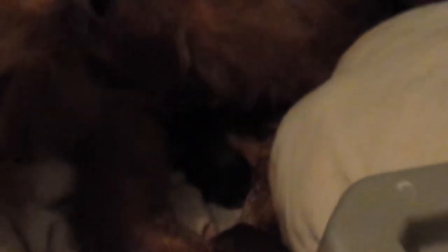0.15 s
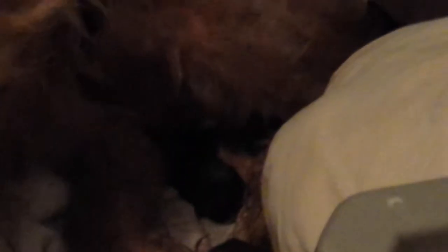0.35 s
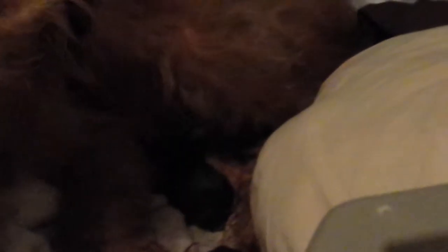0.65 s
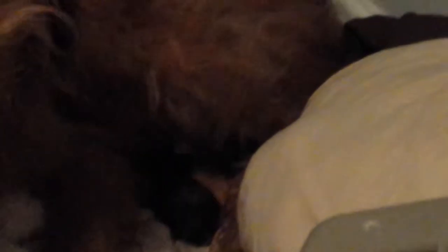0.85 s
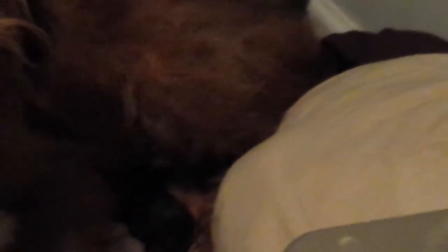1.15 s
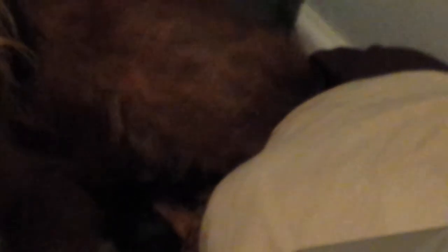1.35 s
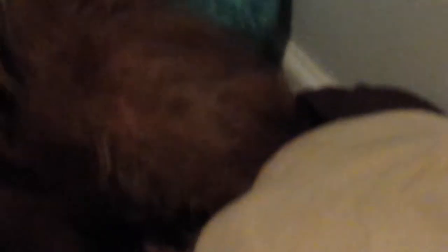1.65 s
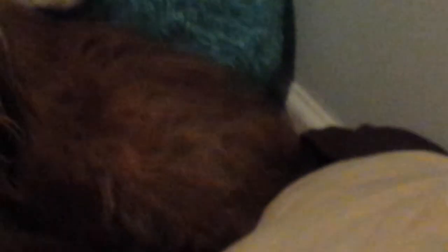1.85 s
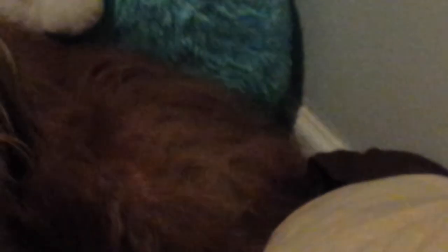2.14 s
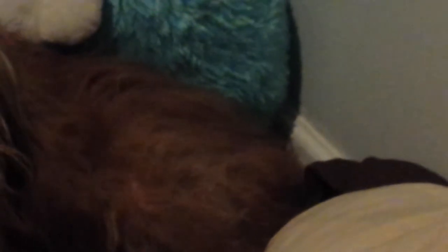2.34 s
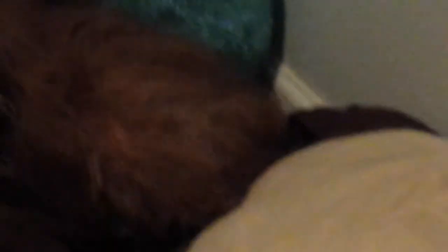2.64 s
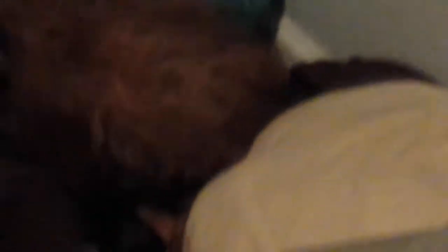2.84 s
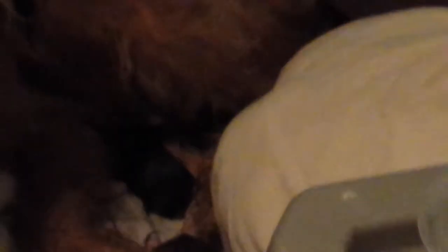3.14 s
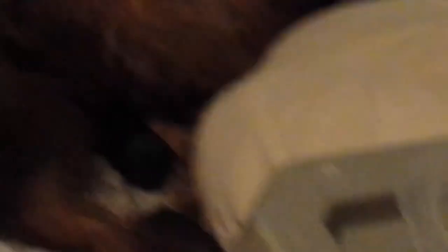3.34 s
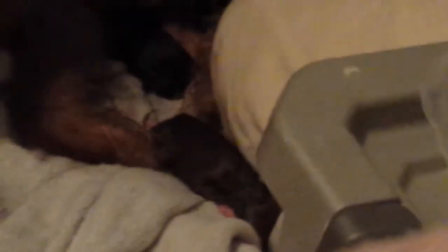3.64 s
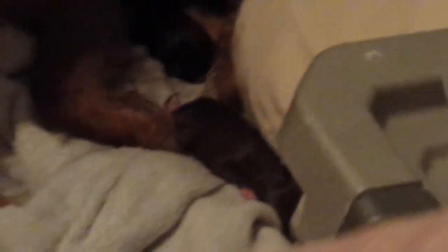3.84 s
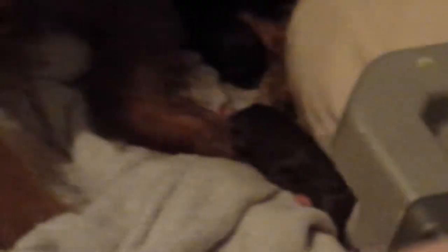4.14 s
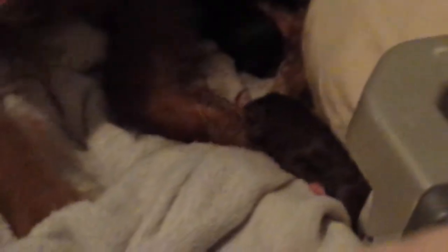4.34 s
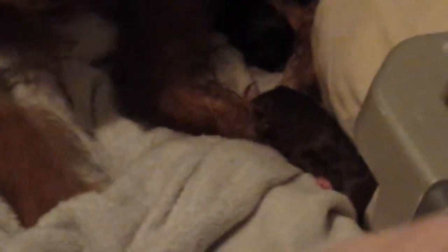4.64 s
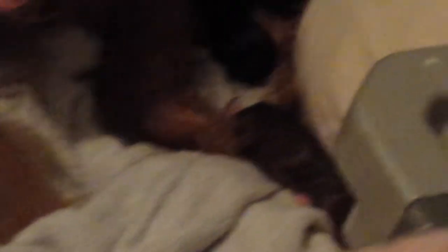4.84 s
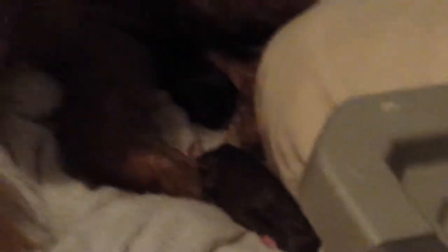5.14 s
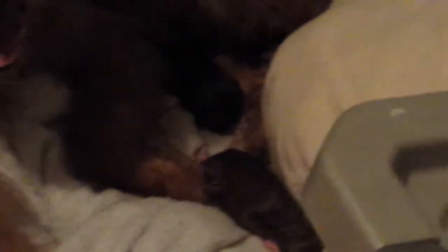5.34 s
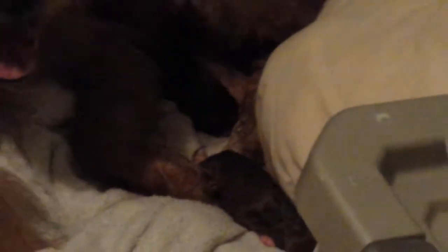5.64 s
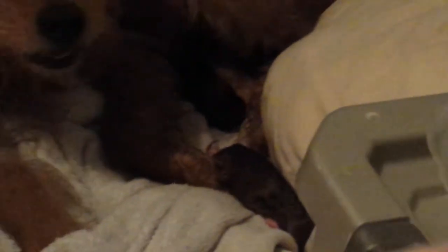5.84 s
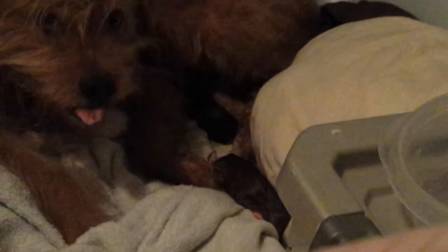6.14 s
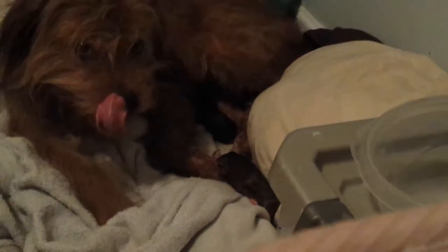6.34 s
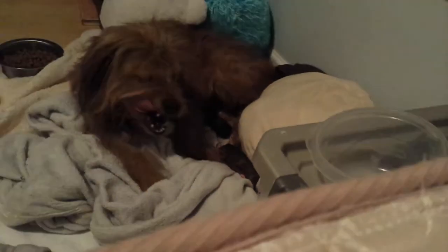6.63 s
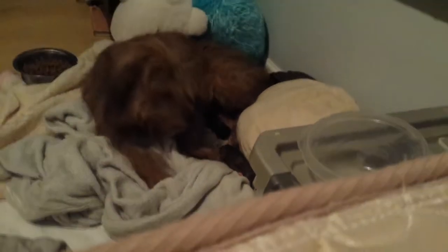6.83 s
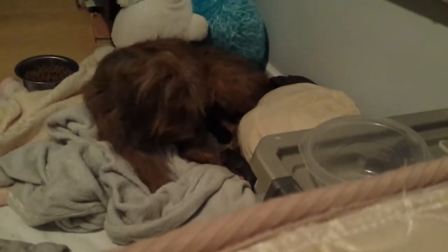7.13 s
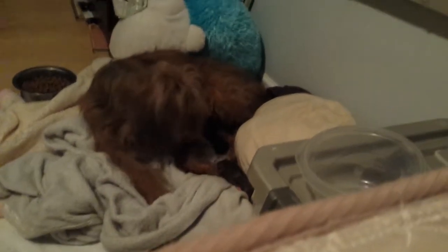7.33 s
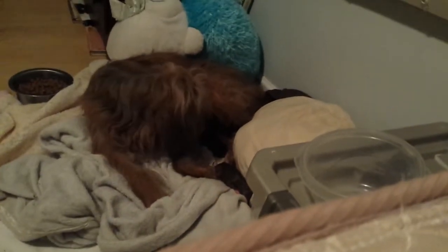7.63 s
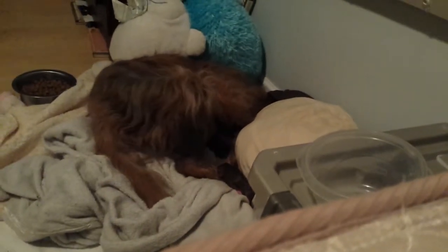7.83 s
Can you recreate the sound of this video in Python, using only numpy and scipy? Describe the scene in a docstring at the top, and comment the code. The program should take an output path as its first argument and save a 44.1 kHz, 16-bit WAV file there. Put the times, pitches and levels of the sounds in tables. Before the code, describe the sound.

Short, thin squeaks come from nursing newborn puppies, about one a second, mixed with little wet mouth clicks. Past the middle, a hoarse whine and then a longer, quavering one rise nearby, mostly on the left. Faint rustling follows as the mother noses through the blankets. The hand-held microphone picks up dull bumps, a few sharp taps and a pop, over the low hum and hiss of a quiet small room.

```python
"""A newborn puppy squeaks and grunts close by in a small room; more squeaks and two long whines follow,
made by tiny vocal folds sounding through a moving mouth. The litter suckles and smacks, and the mother
licks and nuzzles through fur and bedding. The microphone is a hand-held camera's, left port facing the
puppies; fingers bump, creak and tap right on its case and once pop that port. Behind it all an
appliance hums and the microphone hisses."""
import sys
import numpy as np
from scipy import signal
from scipy.fft import rfft, irfft
from scipy.io import wavfile
from scipy.ndimage import uniform_filter1d

SR = 44100
rng = np.random.default_rng(int(sys.argv[2]) if len(sys.argv) > 2 else 0)


def unload_audio(sound):
    """Save the sound as a 16-bit wav file, at the path given as the first command line argument."""
    columns = np.transpose(np.atleast_2d(sound))
    # keep every value between -1 and 1, then stretch to whole-number steps
    steps = np.round(np.clip(columns, -1, 1) * 32767)
    wavfile.write(sys.argv[1], SR, steps.astype(np.int16))


N = 351918
TIME = np.arange(N) / SR

# short squeaks: (time [s], length [s], first pitch [Hz], middle pitch [Hz], last pitch [Hz],
# fundamental [dB], open-mouth overtones [dB], attack [s], release [s], mouth opens after [s],
# open-mouth resonance [Hz], lift above 4 kHz [dB], roughness [0-1])
SQUEAKS = [(0.139, .108, 1174, 1157, 900, -53.5, -42, 0.0044, 0.015, -0.01, 3060, 7, 0.34),
           (1.386, 0.12, 1410, 1350, 1247, -47, -47.5, 0.034, 0.067, -0.0015, 3490, 3, 0.14),
           (2.028, 0.095, 1244, 1392, 1390, -58, -69, 0.011, 0.083, 0.0041, 2800, 0, .1),
           (2.855, .1, 1355, 1287, 1342, -46.5, -32.5, 0.036, 0.017, 0.04, 3980, 8.5, 0.13),
           (3.851, .145, 1426, 1073, 1295, -46, -37, 0.022, 0.092, 0.03, 3940, 7, 0.05),
           (4.715, 0.081, 1450, 1353, 1300, -74.5, -66, 0.025, .05, -0.002, 4150, -8, .05),
           (7.937, 0.044, 2170, 2084, 2050, -67.5, -82, 0.016, .01, .01, 4200, 0, 0.14)]
# long whines, before the muzzle colours them: (time [s], length [s], attack [s], release [s],
# fundamental [dB], overtones [dB], hoarseness [0-1], lift above 4 kHz [dB])
WHINES = [(4.152, 0.26, 0.046, 0.11, -43, -30, 0.44, 13), (5.505, 0.44, 0.053, 0.14, -40.5, -23, .24, -6.5)]
# one pitch curve for each whine: (time [s], pitch [Hz])
WHINE_PITCH = [
    [(4.157, 657), (4.182, 625), (4.203, 810), (4.253, 896), (4.298, 884), (4.325, 797), (4.365, 733),
     (4.395, 905), (4.42, 1038)],
    [(5.505, 1286), (5.535, 1128), (5.578, 1245), (5.622, 1076), (5.648, 860), (5.67, 787), (5.705, 855),
     (5.738, 975), (5.79, 978), (5.842, 812), (5.872, 611), (5.92, 620), (5.945, 680)],
]
# the mouth opens as a whine goes higher: (pitch [Hz], mouth resonance [Hz])
MOUTH_BY_PITCH = [(700, 2570), (880, 2510), (980, 2860), (1100, 3250), (1245, 3300)]
# a whine flares as a harmonic slides through a muzzle resonance: (frequency [Hz], gain [dB])
MUZZLE = [(1900, 0), (2330, -4.5), (2600, 2), (2950, -1.5), (3250, -5), (3550, -2), (3750, 1), (4300, 0.5),
          (6000, -0.5)]
# a puppy's throat: (frequency [Hz], gain [dB])
THROAT = [(500, -12), (1200, 2), (1800, 2), (2600, -0.5), (3200, -5), (3700, 0), (4400, -5), (5500, -9.5),
          (7000, -16), (10000, -25)]
# how much weaker the cries reach the far, right port: (frequency [Hz], gain [dB])
CASE_SHADOW = [(600, -4), (1200, -15.5), (2000, -20), (2800, -33.5), (4500, -34.5), (8000, -6)]
# wet smacks of small mouths: (time [s], relative level [dB], main resonance [Hz])
SMACKS = [(0.3513, -31.5, 3990), (0.7004, -50, 4260), (1.4513, -46, 3950), (3.839, -52, 3900),
          (4.1188, -37.5, 4200), (4.657, -47, 3860), (4.817, -36, 4100), (6.0499, -44, 2580),
          (6.995, -48.5, 1500), (7.004, -48.5, 2730), (7.5168, -44, 3600), (7.637, -42.5, 3760)]
# their resonances: (multiple of the main one [ratio], width [Hz], gain [dB], left minus right [dB])
SMACK_MODES = [(.36, 1300, -2, 5), (1, 590, 8.5, 13.5), (1.45, 470, -25, -3)]
# a muzzle's strokes through fur and bedding: (time [s], length [s], level [dB])
FUR_STROKES = [(5.95, 0.24, -55), (6.66, 0.31, -66), (7.26, 0.25, -69.5), (7.47, 0.48, -69.5)]
# their rustle: (frequency [Hz], relative density [dB])
FUR_SPECTRUM = [(700, -10), (2800, -11), (3900, 5), (5000, -3.5), (7500, -8.5), (12000, -14)]
# taps on the case: (time [s], thud force [dB], thud pitch [Hz], ring force [dB], crack force [dB])
TAPS = [(4.2564, 18.5, 500, 12, -17.5), (4.9843, 8.5, 390, -32, -24), (6.8746, 12, 670, 0, -11)]
# the case's ring and crack: (frequency [Hz], width [Hz], gain [dB], left minus right [dB])
RING_MODES = [(1210, 900, 2.5, 11.8), (2100, 350, -33, 6)]
CRACK_MODES = [(4320, 960, -2.5, 1.5), (5830, 570, 10.5, -12.5), (7540, 670, 3, -1), (14000, 3800, -7, -4)]
# soft bumps of the hand: (time [s], relative level [dB])
HAND_BUMPS = [(1.018, -53.5), (1.374, -50), (2.675, -51.5), (2.733, -51), (3.113, -46), (3.878, -50.5),
              (4.016, -47), (4.176, -46.5), (5.32, -50.5), (5.384, -47)]
# the grip shifts and creaks: (time [s], length [s], level [dB])
GRIP_SHIFTS = [(2.56, 0.092, -58.5), (2.775, 0.08, -53.5), (2.9, 0.31, -55.5), (3.35, .17, -59),
               (4.04, 0.13, -55.5)]
# the grip's dull resonances: (frequency [Hz], width [Hz], gain [dB], left minus right [dB])
GRIP_MODES = [(226, 110, 9.5, -7), (368, 98, -6, -10.5), (503, 87, -51, 43)]
# the rumble in the room and the microphone's hiss: (frequency [Hz], relative density [dB])
RUMBLE_SPECTRUM = [(20, -23.5), (45, -7.5), (88, 1.5), (110, -4.5), (150, -7), (220, -12.5), (500, -24),
                   (2000, -36.5)]
HISS_SPECTRUM = [(800, -1.5), (2500, 2), (4000, -1), (6000, -2.5), (15000, -16.5)]


def puppies(room_db=-6, right_extra_room_db=4):
    """The cries reach the left port directly; the case shades the right one."""
    voice = squeaks() + grunt() + whines()
    left_echo, right_echo = from_db(room_db) * room(voice)
    right = colour(voice + from_db(right_extra_room_db) * right_echo, CASE_SHADOW)
    return np.array([voice + left_echo, right])


def squeaks(depth_db=10.5, flick_s=0.00863, flick_rise=0.154, shut_hz=2660, shut_loss_db=6.5,
            open_s=0.027, stay_s=0.051, close_s=0.11, tired_rough=0.49):
    """Each squeak is one arc of pitch; the mouth opens and lets the overtones out."""
    out = np.zeros(N)
    for (start, length, first, middle, last, fundamental_db, open_db, attack_s, release_s,
         opens_after_s, open_hz, shrill_db, rough) in SQUEAKS:
        span = during(start, length)
        t = TIME[span] - start
        arc = np.polyval(np.polyfit([0, .5, 1], [first, middle, last], 2), t / length)
        # the pitch flicks up as the folds catch and as they let go
        flick = 1 + flick_rise * np.clip(1 - np.minimum(t, length - t) / flick_s, 0, 1)
        rising, fading = ramps(t, length, attack_s, release_s)
        effort_db = -depth_db * (rising + fading)
        opening = np.interp(t - opens_after_s, np.cumsum([0, open_s, stay_s, close_s]), [0, 1, 1, 0])
        mouth_hz = shut_hz + (open_hz - shut_hz) * opening
        overtones_db = opening * open_db + (1 - opening) * (fundamental_db - shut_loss_db)
        out[span] += cry(arc * flick, fundamental_db + effort_db, overtones_db + effort_db, mouth_hz,
                         rough + tired_rough * fading, shrill_db)
    return out


def whines(onset_db=19.5, fade_db=14.5, steady_hz=943, rattle_hz=590, weak_db_per_octave=28,
           base_rough=0.21, fundamental_share=0.45, quiver_spread_db=1.8):
    """A whine swells, holds and fades; the folds rattle when the pitch is low or the effort gives out."""
    out = np.zeros(N)
    for whine, curve in zip(WHINES, WHINE_PITCH):
        start, length, attack_s, release_s, fundamental_db, overtones_db, hoarse, shrill_db = whine
        span = during(start, length)
        pitch = uniform_filter1d(np.interp(TIME[span], *np.transpose(curve)), size=400, mode="nearest")
        rising, fading = ramps(TIME[span] - start, length, attack_s, release_s)
        effort_db = -onset_db * rising - fade_db * fading
        slack = np.clip((steady_hz - pitch) / (steady_hz - rattle_hz), 0, 1)
        rough = hoarse * np.clip(base_rough + slack ** 2 * (1 - rising) + fading, 0, 1)
        weak_db = weak_db_per_octave * np.minimum(np.log2(pitch / steady_hz), 0)
        quiver_db = quiver_spread_db * drift(14, len(pitch))
        # the fundamental swings less than the overtones, so effort brightens the voice
        low_db = fundamental_db + fundamental_share * effort_db + weak_db
        high_db = overtones_db + effort_db + quiver_db - quiver_db.mean()
        out[span] += cry(pitch, low_db, high_db, at_hz(MOUTH_BY_PITCH, pitch), rough, shrill_db)
    return colour(out, MUZZLE)


def grunt(start_s=.236, length_s=.116, pitch_hz=560, fundamental_db=-55, overtones_db=-47, sag_db=5):
    """After the first squeak, slack folds rattle with the mouth wide open; the effort sags midway."""
    span, out = during(start_s, length_s), np.zeros(N)
    t = TIME[span] - start_s
    effort_db = -sag_db * np.sin(np.pi * t / length_s)
    out[span] = cry(np.full(len(t), pitch_hz), fundamental_db + effort_db, overtones_db + effort_db,
                    mouth_hz=3450, rough=0.95, shrill_db=4)
    return out


def cry(pitch, fundamental_db, overtones_db, mouth_hz, rough, shrill_db, mouth_width_hz=380,
        jitter=0.156, half_harmonic_db=-9, air_db=-4, fade_s=0.0022, rolloff_db_per_harmonic=3):
    """Tiny folds sound through a mouth resonance; strained, they jitter, double their period and rasp."""
    t = TIME[:len(pitch)]
    rough = np.clip(rough, 0, 1)
    strain = jitter * rough ** 3 * drift(170, len(t))
    wobble = (.005 + .06 * np.minimum(rough, .3)) * drift(80, len(t))
    pitch = pitch * (1 + strain + wobble)
    phase = 2 * np.pi * np.cumsum(pitch) / SR
    overtones, power = 0, 0
    for harmonic in np.arange(3, 19) / 2:
        hz = harmonic * pitch
        lift_db = at_hz([(3900, 0), (5000, shrill_db)], hz)
        db = at_hz(THROAT, hz) + lift_db - rolloff_db_per_harmonic * max(harmonic - 4.5, 0)
        gain = from_db(db) / np.hypot(1, 2 * (hz - mouth_hz) / mouth_width_hz)
        if harmonic % 1:   # period doubling adds tones half way between the harmonics
            gain = gain * rough * from_db(half_harmonic_db)
        overtones = overtones + gain * np.sin(harmonic * phase)
        power = power + gain ** 2 / 2
    puffs = rng.standard_normal(len(t)) * (1 + np.cos(phase))   # air escapes once a cycle
    rasp = rms_one(colour(puffs, [(1500, -2.5), (2600, -37), (3900, -8), (5200, 0), (8000, -25.5)]))
    upper = overtones / np.sqrt(power) + rasp * rough ** 2 * from_db(air_db)
    upper *= from_db(overtones_db) / np.sqrt(1 + 2 * rough ** 2)
    fundamental = from_db(fundamental_db) * np.sqrt(2) * np.sin(phase)
    hiss = puffs * from_db(overtones_db / 2 - 51.5)   # a thin hiss grows more slowly than the tone
    shimmer = from_db(2.6 * rough * drift(160, len(t)))
    fade = np.clip(np.minimum(t, t[-1] - t) / fade_s, 0, 1)
    return fade * (shimmer * (fundamental + upper) + hiss)


def smacks(force_db=17, room_db=-13, cut_hz=9000):
    """A film of spit snaps in a quick spatter; the mouth's opening sets the pitch."""
    out = 0
    for at_s, db, main_hz in SMACKS:
        modes = [(ratio * main_hz, *rest) for ratio, *rest in SMACK_MODES]
        spatter = bursts([(at_s, db + force_db)], decay_s=0.00066, scatter=0.45)
        out = out + resonate(spatter, modes)
    return soften(out + from_db(room_db) * room(out), cut_hz)


def suckling(per_s=5, force_db=-34, room_db=-6):
    """Faint ticks of nursing mouths come at random."""
    force = (rng.random(N) < per_s / SR) * from_db(force_db - 10 * rng.random(N))
    ticks = resonate(force, [(1400, 900, 3.5, 0.2), (3700, 1800, 4.5, 2)])
    return ticks + from_db(room_db) * room(ticks)


def fur(flutter_db=3, resting_db=-77):
    """Nuzzling brushes fur and blanket in uneven strokes over a faint, constant rustle."""
    strokes = swells(FUR_STROKES, attack_s=0.034, release_s=0.33, depth_db=8.5)
    level = np.hypot(from_db(resting_db), strokes)
    return level * from_db(flutter_db * drift(13, N)) * stereo_noise(FUR_SPECTRUM, alike=0.096)


def taps(thud_cut_hz=1150, thud_width_hz=395, thud_pan_db=-5.5, ring_cut_hz=2600, room_db=-30):
    """A fingertip knocks the case: a dead thud, pitched by where it lands, a short ring and a crack."""
    out = 0
    for at_s, db, hz, *_ in TAPS:
        knock = soften(clicks([at_s], db), thud_cut_hz)
        out = out + resonate(knock, [(hz, thud_width_hz, 0, thud_pan_db)])
    times, _, _, ring_db, crack_db = np.transpose(TAPS)
    out += resonate(soften(clicks(times, ring_db), ring_cut_hz), RING_MODES)
    out += resonate(clicks(times, crack_db), CRACK_MODES)
    return out + from_db(room_db) * room(out)


def port_pop(at_s=6.0957, step_db=-8, leak_hz=92, right_db=-32):
    """A finger uncovers the left port: a pressure step that leaks away and undershoots."""
    step = from_db(step_db) * (TIME > at_s) + 1e-12 * rng.standard_normal(N)
    pop = signal.sosfilt(signal.butter(2, leak_hz, "high", fs=SR, output="sos"), step)
    return pop * from_db([[0], [right_db]])


def hand(bump_force_db=37, slips_per_s=68, bump_cut_hz=720, slip_cut_hz=2700):
    """Handling noise: skin bumps the case, and sticks and slips on it as the grip shifts."""
    force = from_db(bump_force_db) * bursts(HAND_BUMPS, decay_s=0.024, scatter=0.044)
    bumps = resonate(soften(force, bump_cut_hz, order=4), GRIP_MODES)
    travel = np.cumsum(slips_per_s * np.exp(0.29 * drift(33, N))) / SR
    slips = np.diff(np.floor(travel), prepend=0) * from_db(3 * drift(60, N))
    friction = slips + .015 * rng.standard_normal(N)
    creak = rms_one(resonate(soften(friction, slip_cut_hz), GRIP_MODES))
    return bumps + creak * swells(GRIP_SHIFTS, attack_s=0.037, release_s=0.051, depth_db=9.5)


def room(x, gap_s=0.0013, early_t60_s=0.2, late_t60_s=0.47, late_db=-10):
    """Near walls answer quickly; the room's late ring is fainter. Each port hears its own echoes."""
    t = TIME[:SR // 2]
    decay = from_db(-60 * t / early_t60_s) + from_db(late_db - 60 * t / late_t60_s)
    tail = rng.standard_normal((2, len(t))) * decay * (t > gap_s)
    tail /= np.sqrt(np.sum(tail ** 2, axis=1, keepdims=True))
    return signal.fftconvolve(np.atleast_2d(x), tail, axes=1)[:, :N]


def room_tone(hum_hz=119.5, hum_db=-55.5, waver_db=1.5, rumble_db=-57, hiss_db=-71):
    """An appliance hums at twice the mains rate over its own rumble; the microphone hisses."""
    hum = np.sqrt(2) * from_db(hum_db - waver_db * drift(5.1, N)) * np.sin(2 * np.pi * hum_hz * TIME)
    rumble = from_db(rumble_db) * stereo_noise(RUMBLE_SPECTRUM, alike=0.3)
    hiss = from_db(hiss_db) * stereo_noise(HISS_SPECTRUM, alike=-0.19)
    return hum * from_db([[.8], [-.8]]) + rumble + hiss   # the hum sits a little to the left


def from_db(db):
    """Decibels to gain."""
    return 10 ** (np.asarray(db) / 20)


def rms_one(x):
    """Scale to rms 1."""
    return x / np.sqrt(np.mean(x ** 2) + 1e-20)


def at_hz(points, hz):
    """Read a curve on a log-frequency axis."""
    f, value = np.transpose(points)
    return np.interp(np.log(np.maximum(hz, 1)), np.log(f), value)


def colour(x, spectrum):
    """Filter by a curve of (frequency [Hz], gain [dB])."""
    n = x.shape[-1]
    return irfft(rfft(x) * from_db(at_hz(spectrum, np.fft.rfftfreq(n, 1 / SR))), n)


def drift(rate, size):
    """Random wander up to about rate per second, spread 1."""
    f = np.fft.rfftfreq(size, 1 / SR)
    return rms_one(irfft(rfft(rng.standard_normal(size)) / (1 + (f / rate) ** 2), size))


def stereo_noise(spectrum, alike):
    """Coloured noise; alike is the correlation between the two ports."""
    mid, side = rng.standard_normal((2, N))
    return rms_one(colour(np.sqrt(1 + alike) * mid + np.sqrt(1 - alike) * side * [[1], [-1]], spectrum))


def clicks(times, db):
    """One impulse for each event."""
    out = np.zeros(N)
    out[np.round(np.asarray(times) * SR).astype(int)] = from_db(db)
    return out


def bursts(events, decay_s, scatter):
    """Each event is a first snap followed by a dying scatter of smaller ones."""
    t = TIME[:SR // 20]
    force = np.zeros(N)
    for at_s, db in events:
        burst = scatter * rng.standard_normal(len(t)) * np.exp(-t / decay_s)
        burst[0] = 1
        start = int(at_s * SR)
        force[start:start + len(t)] += from_db(db) * burst / np.linalg.norm(burst)
    return force


def resonate(force, modes, port_lag_s=.0003):
    """Damped resonances in parallel, each with its own balance; the sound meets the right port first."""
    out = np.zeros((2, N))
    for hz, width_hz, db, pan_db in modes:
        radius = np.exp(-np.pi * width_hz / SR)
        feedback = [1, -2 * radius * np.cos(2 * np.pi * hz / SR), radius ** 2]
        ring = (1 - radius ** 2) / 2 * signal.lfilter([1, 0, -1], feedback, force + 1e-18)
        out += ring * from_db([[db + pan_db / 2], [db - pan_db / 2]])
    return np.array([np.roll(out[0], int(port_lag_s * SR)), out[1]])


def soften(x, cut_hz, order=2):
    """Low-pass: a soft contact has little treble."""
    return signal.sosfilt(signal.butter(order, cut_hz, fs=SR, output="sos"), x)


def during(start, length):
    """The samples that an event covers."""
    return (TIME >= start) & (TIME < start + length)


def ramps(t, length, attack_s, release_s):
    """How much of the attack is still to come and how much of the release has passed, each 0-1."""
    return np.clip(1 - t / attack_s, 0, 1), np.clip(1 - (length - t) / release_s, 0, 1)


def swells(events, attack_s, release_s, depth_db):
    """The gain of movements that swell, hold and die away."""
    gain = np.zeros(N)
    for start, length, db in events:
        span = during(start, length)
        rising, fading = ramps(TIME[span] - start, length, attack_s, release_s)
        gain[span] += from_db(db - depth_db * (rising + fading))
    return gain


def scene():
    """The litter, the hand on the case and the room tone, at the microphone's two ports."""
    return puppies() + suckling() + smacks() + fur() + taps() + port_pop() + hand() + room_tone()


def record(dry, cutoff_hz=15700):
    """The camera cuts the top treble steeply."""
    return signal.sosfilt(signal.ellip(10, .1, 70, cutoff_hz, fs=SR, output="sos"), dry)


dry = scene()
out = record(dry)
unload_audio(out)
```